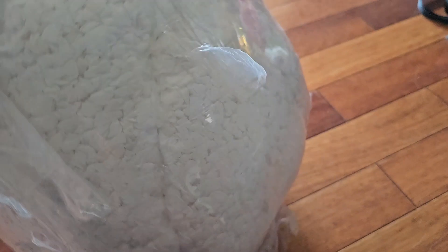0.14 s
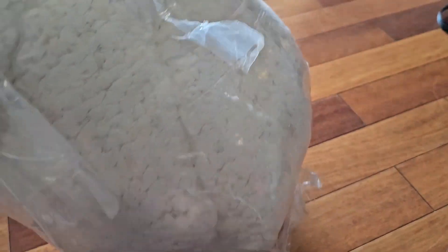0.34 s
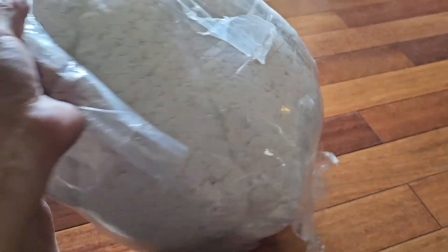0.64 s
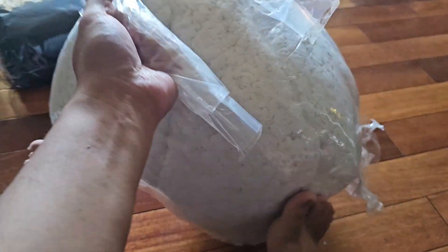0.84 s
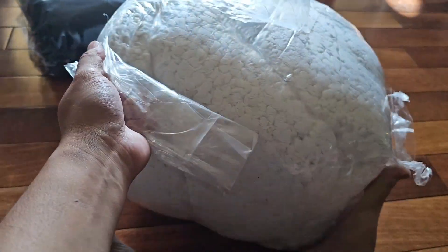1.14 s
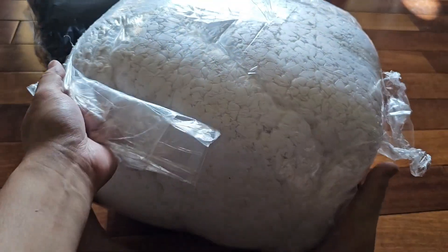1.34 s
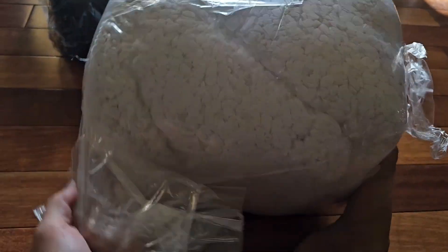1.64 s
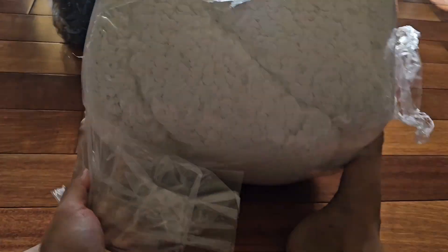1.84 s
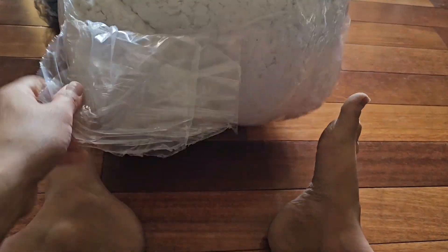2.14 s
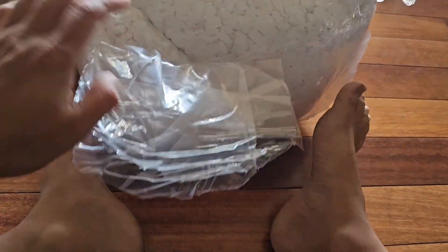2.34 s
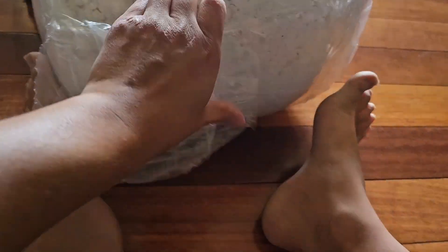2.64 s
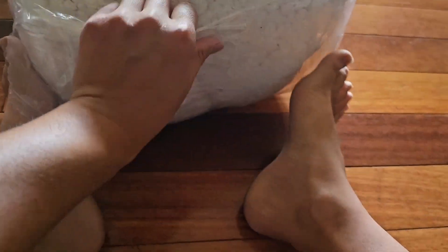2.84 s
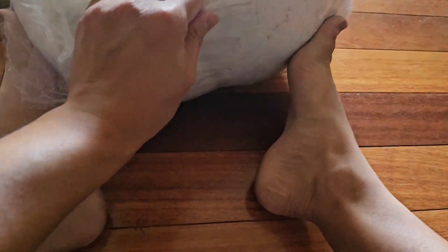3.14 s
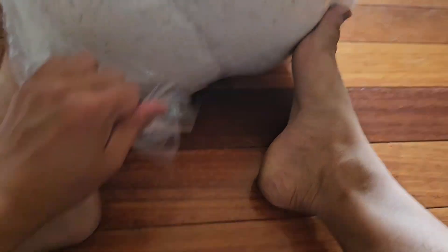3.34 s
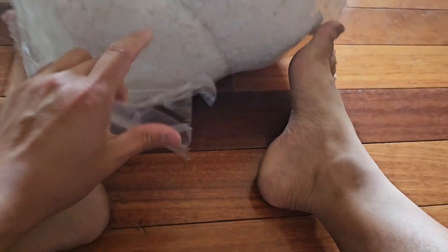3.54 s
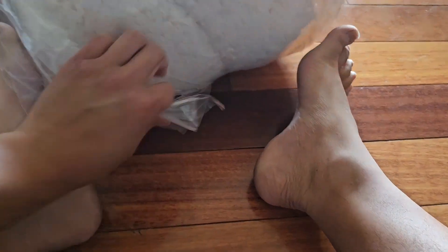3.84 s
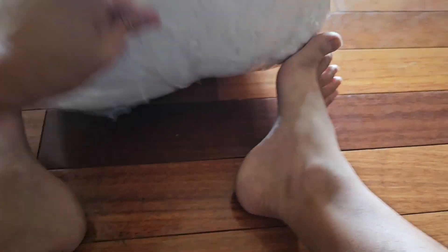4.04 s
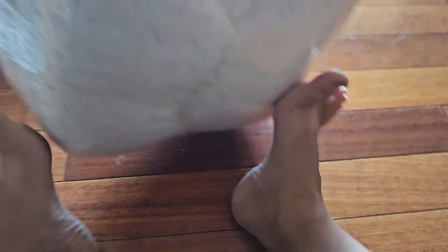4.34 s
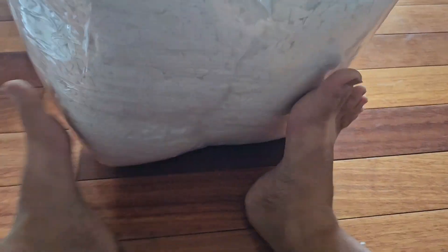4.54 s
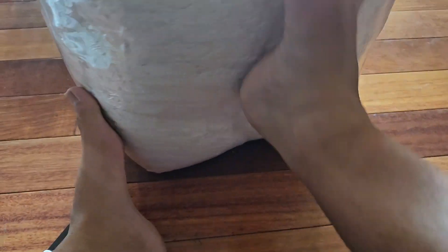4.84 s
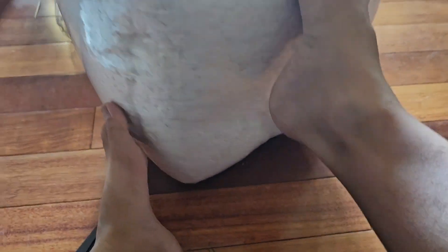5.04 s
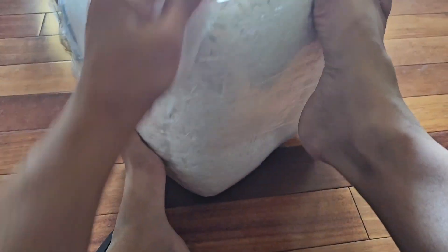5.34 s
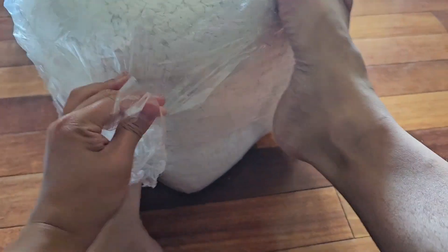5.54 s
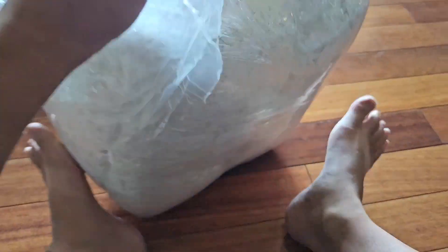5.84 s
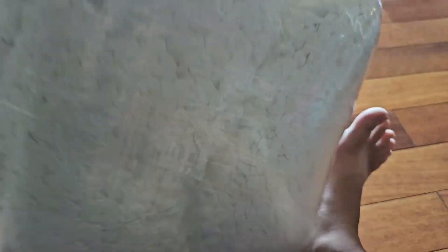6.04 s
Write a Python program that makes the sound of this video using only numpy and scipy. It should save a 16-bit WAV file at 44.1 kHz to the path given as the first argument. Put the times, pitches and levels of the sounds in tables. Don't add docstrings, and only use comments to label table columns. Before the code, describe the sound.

In a small bare quiet room, close to a phone microphone, thick plastic film rustles strongly at 0 s as a wrapped foam bale tips, with a pop and dull bump at 0.1 s. Small dents pop around 0.4 s with a faint high squeak at 0.5 s. A tape corner snaps at 0.88 s, then light crackles and ticks thin out. From 1.58 to 1.76 s a loud stuttering rip, film drumming hollowly. Sparse picking follows, growing denser from 2.6 to 3.0 s. A second, thumpier and very loud rip runs 3.2 to 3.37 s, ending in flutter. Quiet tugging crinkles lead to a flurry and a hard knock at 4.3 s, another at 4.5, then faint squeaks near 4.7. Film tenses with ticks from 5.0, building into a long rip at 5.36 to 5.55 s. Wrap crinkles off, the bale lands softly at 5.9, and a last snap sounds at 6.16 s.

```python
import sys
import numpy as np
from scipy import signal
from scipy.fft import rfft, irfft, next_fast_len
from scipy.io import wavfile
from scipy.ndimage import uniform_filter1d

SR = 44100
rng = np.random.default_rng(int(sys.argv[2]) if len(sys.argv) > 2 else 0)


def store_wav(level_fs):
    pcm = np.round(np.clip(np.atleast_2d(level_fs), -1, 1) * 32767)
    wavfile.write(sys.argv[1], SR, pcm.T.astype(np.int16))


def voltage_ratio(decibels):
    exponent = np.asarray(decibels, float) / 20
    return 10 ** exponent


N = 273420

# pitch_hz, density_db
HUSH_COLOUR = [(15, -38), (25, -0.5), (97, 0.5), (818, -19), (1130, -22.5), (5140, -32), (10100, -99),
               (13600, -36), (16000, -18.5)]
# pitch_hz, t60_s
ROOM_DECAY = [(100, 0.17), (260, 0.46), (700, 0.41), (1840, 0.49), (4850, 0.43), (12800, 0.4)]
# pitch_hz, level_db
ROOM_TONE = [(100, -6.5), (300, -4), (1000, -8), (4000, -5.5), (8000, -7), (11000, -9.5), (16000, -7)]
# pitch_hz, t60_s, level_db
STANDING = [(87.7, 0.93, -6), (176.6, 0.44, -3.5), (365, 0.63, 5)]
# pitch_hz, likeness_0_to_1
ALIKE = [(60, 0.97), (300, 0.97), (700, 0.94), (1500, 0.73), (3000, 0.25), (12000, 0.31)]
# pitch_hz, level_db
LEFT_TILT = [(30, 0), (110, 4), (200, 3.5), (1500, 3), (2800, 5), (5500, 1), (9500, 8), (14000, 3.5)]
# pitch_hz, level_db
PHONE_TONE = [(100, -2), (1000, 2), (2200, 7.5), (5000, 4.5), (10000, 10), (11600, 17.5), (13000, 11),
              (15500, 13)]
# start_s, peak_db, boom_over_peak_db
BUMPS = [
    (0.092, -29, -30),
    (0.239, -58, -12),
    (1.08, -58, 15),
    (3.11, -33, -4),
    (4.327, -20.5, -27),
    (4.523, -28.5, -12),
    (5.779, -37, -17),
    (5.92, -31.5, 0.5),
    (6.066, -39, -22),
]
# peak_s, rumble_db, fade_s
SHIFTS = [
    (0, -43, 1),
    (1.093, -47, 1),
    (1.721, -38.5, 0.24),
    (1.961, -37.5, 0.054),
    (3.327, -33.5, 0.22),
    (4.555, -48, 0.13),
    (5.0, -52.5, 0.48),
    (5.557, -34.5, 0.16),
    (5.951, -38.5, 0.17),
]
# pitch_hz, then rows of time_s, level_db
SQUEAKS = [
    (1880, [(.495, -47), (.52, -43), (.55, -59), (.62, -62), (.67, -56), (.76, -72)]),
    (1560, [(4.69, -66), (4.72, -57), (4.78, -61)]),
    (759, [(4.64, -60), (4.67, -56), (4.8, -58), (4.86, -67)]),
]
# pitch_hz, density_db
CRACKLE_COLOUR = [(900, -20.5), (2200, -2.5), (3000, -6.5), (6300, -4.5), (8400, -8.5), (10200, -12.5),
                  (11600, -7), (16000, -10.5)]
# pitch_hz, density_db
BODY_COLOUR = [(70, -15), (150, -12.5), (200, 4), (274, -1), (365, -11), (530, -4.5), (800, -5),
               (1260, -7.5), (1480, -5.5), (2500, -22.5), (5000, -70.5)]
# time_s, crackle_db
GRIP = [(0, -41.5), (.8, -56.5), (1.0, -45), (1.3, -49.5), (1.54, -57), (1.98, -48), (2.25, -52),
        (2.57, -66.5), (2.585, -50.5), (3.13, -56), (3.19, -84), (3.55, -51), (3.71, -75), (3.8, -53),
        (4.6, -79), (4.72, -50.5), (5.7, -49), (6.03, -56)]
# peak_s, crackle_db, fade_s, body_over_crackle_db
STROKES = [(0, -26.5, 0.044, 5.5), (.11, -30, 0.1, -4), (.514, -50.5, 0.19, -16), (.848, -47.5, 0.2, 5.5),
           (1.162, -35, 0.18, -6), (1.58, -36.5, 0.015, -9), (2.16, -53, 0.1, 12), (2.604, -41.5, 0.07, -3),
           (2.834, -25.5, 0.07, -17), (2.933, -31.5, 0.054, -4.5), (3.245, -22, 0.019, -4),
           (3.562, -49, 0.14, -7), (3.761, -45.5, 0.075, -7), (3.921, -42.5, 0.039, -21),
           (4.069, -37, 0.18, -9), (4.23, -34, 0.038, -4), (4.28, -31.5, .17, -6), (4.547, -41, 0.045, 0.5),
           (4.929, -44.5, 0.59, -13), (5.295, -32.5, 0.14, -15), (5.79, -33, 0.17, -3.5),
           (5.867, -38.5, 0.2, -14), (6.076, -40.5, 0.19, -10), (6.162, -34.5, 0.021, -2)]
# start_s, peak_db, pitch_hz
DENTS = [(0.243, -31, 815), (0.383, -27, 2170), (0.409, -30, 2110), (0.447, -24, 2140), (0.478, -42, 651),
         (1.134, -26, 2240), (1.153, -25, 1280), (1.685, -15, 1070), (2.826, -19, 1450), (3.034, -19, 2180),
         (3.225, -14, 815), (3.307, -11.5, 685), (3.325, -13, 720), (3.335, -13.5, 656), (3.349, -15, 810),
         (4.27, -21, 1500), (4.281, -26, 776), (4.326, -20, 710), (5.416, -21, 750), (5.429, -17, 910),
         (5.481, -17, 990), (5.530, -14.5, 990), (5.541, -15.5, 780)]
# start_s, peak_db, pitch_hz
SLACK = [(0.875, -34, 290), (0.937, -38.5, 290), (1.594, -25, 229), (1.660, -20.5, 292), (1.738, -16, 300),
         (1.757, -23.5, 363), (1.777, -27, 364.7), (3.330, -17.5, 344), (3.345, -19.5, 354),
         (3.360, -20.5, 363), (4.222, -33, 312), (5.529, -18, 276), (5.780, -35, 294), (5.796, -37, 267.8),
         (6.134, -41, 410), (6.160, -39, 350)]
# start_s, peak_db
SNAPS = [
    (0.094, -11),
    (0.8772, -9),
    (3.2485, 5),
    (6.1608, -5),
]
# start_s, level_db
FAR_POPS = [
    (.001, -4),
    (0.093, 5.5),
]
# pitch_hz, density_db
TEAR_COLOUR = [(880, -28), (1500, -13), (2120, -8.5), (3400, -3), (5600, -3.5), (10300, -9.5), (11600, -2),
               (13500, -11), (16000, -36)]
# start_s, length_s, tear_db, drum_db, lower_at_start_db, shrillness_db
RIPS = [
    (1.588, 0.15, -20, -19.5, 0.5, 1),
    (3.312, 0.0535, -19.5, -19.5, 3.5, 2),
    (5.357, 0.1793, -13, -22, 21, -3),
]
# low_hz, high_hz, swell_s
BANDS = [
    (2860, 6930, 0.0009),
    (580, 1790, 0.0013),
    (167, 530, 0.0038),
    (9800, 19850, 0.001),
]
# peak_s, crack_db, knock_over_crack_db, fizz_over_crack_db
TURNING = [(0.0942, -17.5, 1, -8.5), (0.2052, -37, -5, -9), (0.3047, -45, -11, -6),
           (0.3128, -34.5, -0.5, -10), (0.384, -39, -12, -5), (0.3938, -42, -16, 1), (0.4369, -41, 0, -6.5),
           (0.4539, -39, -10, 1.5), (0.5783, -40.5, -11, 4.5), (0.6599, -43.5, -1.5, -8),
           (0.7122, -53, -7, -1.0)]
PEELING = [(0.8222, -47, -9, 0), (0.8349, -30, -15, 9.5), (0.8453, -50, -10, 21), (0.8773, -22.5, -9, 0),
           (0.984, -42, -10.5, 4.5), (1.0139, -37.5, 1, -6), (1.0325, -41, -4, 1), (1.1188, -48, 1.0, 0),
           (1.1345, -35.5, 4.5, -6.0), (1.1541, -33.5, 2, -10.5), (1.1769, -35, -4.5, -10),
           (1.2163, -38, -19, -1), (1.269, -48.5, -16, 9), (1.3002, -36.5, -5, -8),
           (1.3271, -42.0, -11, -7), (1.3567, -42, -6, -4), (1.3785, -44, -15, -14),
           (1.4033, -42, -2.5, -2), (1.432, -46.5, -8, -8.5), (1.4437, -57, -13, -5),
           (1.4649, -49, -10, -1)]
FIRST_RIP = [(1.5605, -43, -5.5, 7), (1.5725, -26.5, -18, 5), (1.5785, -31.5, -16.0, 6),
             (1.5864, -23, -10, 2), (1.596, -20, -8, -3.5), (1.6039, -17, -9, -5.5),
             (1.6089, -11, -10, -5.5), (1.6145, -14, -4.5, -13), (1.6222, -16, -7.5, -8),
             (1.6282, -12.5, -25, -3), (1.6355, -8.5, -14, -5.5), (1.6405, -9, -15, -7),
             (1.6474, -19, -23.5, -12.5), (1.6547, -15, -11, -6), (1.6617, -13.5, -12, -2),
             (1.6702, -15, -6, -1), (1.6743, -16, -4, 1), (1.6855, -16, 2, -1), (1.691, -11.5, -10.5, -6.5),
             (1.7039, -9, -14, -3.5), (1.7086, -8, -12, -7), (1.7191, -10.5, -4.5, 0),
             (1.7263, -16.5, -14, -7), (1.7368, -9.5, -4, -5.5)]
PICKING = [(2.0236, -46, -16, -4), (2.1452, -40, -22, -7), (2.155, -42, -18, -9), (2.1955, -38.5, -26, -11),
           (2.2888, -45, -22, -2.5), (2.3457, -53, 4, -4), (2.3815, -38.5, -15, -6),
           (2.5953, -32.5, -13, -7.0), (2.6163, -36, -19, 1), (2.6381, -31.5, -3.5, -4),
           (2.668, -38.5, -3, 3), (2.6877, -34.5, -12, -8), (2.7161, -32, 0, -2), (2.7427, -30.5, 1, 4.5),
           (2.775, -42, -17, -5.0), (2.7936, -24.5, -10, 1), (2.8133, -26.5, -5, 4),
           (2.8204, -21, -24, -1.0), (2.8297, -16.5, -20, -4), (2.8347, -24.5, -2, -18),
           (2.8468, -24, -4, -3), (2.8797, -33, -19, 3), (2.9127, -19, -10.5, -5), (2.9222, -19.5, -1, 2),
           (2.9412, -18, -9, -13), (3.0337, -25, -7.5, 2), (3.0445, -44, -11, -3),
           (3.0984, -36.5, -15.0, -3), (3.1156, -40.5, 7, -9)]
SECOND_RIP = [(3.2097, -20, -31, 2.5), (3.2219, -18, 3.5, -11), (3.2266, -10.5, -6.5, 0.5),
              (3.2385, -17, -8, -5), (3.2487, -8.5, -1, -1), (3.2594, -17, -3, -1), (3.2662, -19, 0, 3),
              (3.2818, -8.5, -3, -2), (3.2905, -8.5, -0.5, -4.5), (3.3055, -10.5, -4, -1.5),
              (3.3091, -15.5, -5, -2), (3.3229, -10.5, -0.5, -2), (3.3407, -18.5, 0, 4.5),
              (3.3617, -15, -4, -2)]
FLUTTER = [(3.334, -21, 2.4, 1.5), (3.347, -29, 2.7, 5), (3.353, -24.5, 1.8, 6), (3.367, -27.5, 2.6, -4)]
TUGGING = [(3.5552, -39, -14, 2), (3.6105, -34.5, -3.5, -17), (3.6205, -41.5, -11, 2),
           (3.7366, -41.5, -9, -11), (3.7636, -40.5, -9, 1), (3.7776, -44, -14.5, -10), (3.809, -54, 3, 4),
           (3.8161, -45, -10, -4), (3.86, -37, 0, -4), (3.8835, -47.5, -8.0, 0.5), (3.9009, -45.0, -3, 2.5),
           (3.9097, -31, -2, 2), (3.9264, -27.5, -4.5, -4.5), (3.9608, -42, -18, -9.5),
           (3.9837, -47, -20.0, 6.5), (4.0291, -39, -2, 7), (4.0836, -44, -13, 7), (4.0929, -42, -16.0, 10),
           (4.2219, -25, -4, 7), (4.233, -24.5, -4, 6.5), (4.2423, -33.0, -8, 8), (4.2568, -36, 3, 8.0),
           (4.2648, -26, -1.5, 2), (4.2743, -33.5, 1, 15.5), (4.2829, -21, -2, -8), (4.2888, -29, -14, 1),
           (4.3042, -44, -13, 20), (4.3202, -29.5, -15, 10), (4.3278, -16.5, -6.5, -3),
           (4.4905, -46, -11, 3), (4.5454, -42, -18, 6.5), (4.5648, -42, -8, -1), (4.634, -42.5, -13.0, 3),
           (4.6425, -36.5, -9, -6), (4.6592, -41, -8, -2), (4.6655, -44, 4, -2), (4.7485, -45, -14, -10),
           (4.8246, -48, -9, 4), (4.8641, -38, -6.5, 0), (4.8732, -47, -8.0, 2.5),
           (4.9295, -29.5, -2.5, -2)]
TENSING = [(5.019, -49, -13.5, 4), (5.0415, -35.5, -14, -1), (5.0667, -36.5, -7.5, -1),
           (5.1066, -37, -10, -3), (5.1255, -37.0, -15, -5), (5.1497, -36.5, -6.5, -3),
           (5.1853, -38, -3, 2), (5.2307, -35.5, -19, 5.5), (5.2655, -53, -12, -3.5), (5.2791, -32, 1, 2.5),
           (5.2875, -24, -9, -1.0), (5.2956, -27.5, -14, -2.5), (5.311, -32, -6, 9), (5.3292, -29, -11, 5),
           (5.3705, -23.5, -8, 3), (5.3801, -22, -9, 4)]
THIRD_RIP = [(5.3993, -23, -6, 2.5), (5.4107, -20, -2, 3), (5.4174, -21, -9, 2), (5.43, -20.5, -7, 4),
             (5.438, -18, -4, -0.5), (5.4475, -15.5, -6, 1), (5.4557, -16, -4, 1), (5.4656, -15.5, -4, -4),
             (5.4761, -14.5, -7, 4.5), (5.5021, -17, -14, -3), (5.5077, -11, -10, -2), (5.5134, -20, 0, 7),
             (5.5212, -15, -4, -1.5), (5.5315, -13.5, -0.5, -3), (5.5424, -17, -1.5, -0.5)]
SHEDDING = [(5.7025, -39, -15, -5.0), (5.7652, -35, -21.0, -1), (5.7707, -34, -7, -6.5),
            (5.7864, -33, -11, -5), (5.8083, -21, -16, -3.5), (5.8474, -26.5, -18, 6),
            (5.865, -26, -2, 0.5), (5.8733, -21, -5, 1), (5.9713, -32, -1, 2.5), (6.0091, -42, -7, 2),
            (6.0603, -44, -3, 1), (6.0662, -39, 1, 2), (6.0807, -45, -7, 7.0), (6.0915, -38, -1, 0),
            (6.0977, -34.5, -18, -17), (6.1362, -30.5, -5, -2), (6.1445, -27, -6, -1),
            (6.1618, -24, -1.5, -10), (6.1862, -33.5, -12, -2.0)]
# releases, thump_over_crack_db, swell_slowness (ratio), drag (ratio)
GESTURES = [
    (TURNING, -12.5, 1.083, 0.884),
    (PEELING, -8, 0.71, 1.1),
    (FIRST_RIP, -10.5, 1.2, 1.15),
    (PICKING, -16.5, .8, 1.1),
    (SECOND_RIP, -12.5, .3, 1.4),
    (FLUTTER, -1, 0.9, 0.98),
    (TUGGING, -11, 1.1, .9),
    (TENSING, -23, 1.1, 1),
    (THIRD_RIP, -22, 1.4, 1.05),
    (SHEDDING, -10.5, 0.97, .9),
]


def unit(x):
    return x / np.sqrt(np.mean(x ** 2) + 1e-20)


def along(points, hz):
    f, v = np.transpose(points)
    return np.interp(np.log(hz + 1), np.log(f + 1), v)


def curves(rows):
    s, *cols = np.transpose(rows)
    return [np.interp(np.arange(N) / SR, s, c, -120, c[-1]) for c in cols]


def swells(rows, rise_s, rise_share):
    s, db, fade = np.array(rows).T[:3, :, None]
    late = np.arange(0, N, 16) / SR - s
    rise = rise_s + rise_share * fade
    return db - 20 * np.where(late > 0, late / fade, -late / rise)


def summed(levels_db, floor_db):
    power = np.repeat(np.sum(voltage_ratio(2 * levels_db), 0), 16)[:N]
    return np.sqrt(power + voltage_ratio(2 * floor_db))


def filtered(x, response):
    m = next_fast_len(x.shape[-1] + 4096)
    return irfft(rfft(x, m) * response(np.fft.rfftfreq(m, 1 / SR)), m)[..., :x.shape[-1]]


def ports(size):
    turn = lambda hz: np.arccos(np.clip(along(ALIKE, hz), 0, 1)) / 2
    middle_side = lambda hz: np.array([np.cos(turn(hz)), np.sin(turn(hz))])
    pair = filtered(rng.standard_normal(size), middle_side)
    return np.array([[1, 0.87], [1, -2.0]]) @ pair


def noise(colour):
    return filtered(ports(size=(2, N)), lambda hz: voltage_ratio(along(colour, hz)))


def grains(rate, spread_db, life):
    strength = voltage_ratio(np.minimum(spread_db * rng.exponential(size=N), 17))
    hits = (rng.random(N) < rate / SR) * strength
    fade = np.exp(-1 / (life * SR))
    return signal.lfilter([np.e * (1 - fade)], [1, -2 * fade, fade ** 2], hits)


def two_tone(colour, base, shared, rate, spread_db, life):
    share = lambda hz: 1 / (1 + (hz / 7500) ** 4)
    dull, bright = (noise(colour) * (base + shared + grains(rate, spread_db, life)) for _ in range(2))
    low = filtered(dull, lambda hz: np.sqrt(share(hz)))
    high = filtered(bright, lambda hz: np.sqrt(1 - share(hz)))
    return unit(low + high)


def hush():
    return voltage_ratio(-52.5) * unit(noise(HUSH_COLOUR))


def room(x):
    out, step = np.zeros((2, N + SR)), SR // 4
    for a in range(0, N, step):
        hz, t, z = signal.stft(ports(size=(2, SR * 3 // 5)), SR, nperseg=256)
        decay = voltage_ratio(-60 * t / along(ROOM_DECAY, hz)[:, None])
        tail = signal.istft(z * decay, SR, nperseg=256)[1]
        tail = tail * (1 - np.exp(-np.arange(tail.shape[1]) / (0.00015 * SR)))
        wet = signal.fftconvolve(x[None, a:a + step], tail / np.linalg.norm(tail[0]), axes=1)
        out[:, a:a + wet.shape[1]] += wet
    return filtered(out[:, :N], lambda hz: voltage_ratio(along(ROOM_TONE, hz)))


def standing(x):
    return sum(voltage_ratio(db) * signal.lfilter(*signal.iirpeak(hz, hz * t60 / 2.3, SR), x)
               for hz, t60, db in STANDING)


def boards():
    out, t = np.zeros(N + SR), np.arange(SR // 2) / SR
    sos = signal.butter(2, [90, 500], "band", fs=SR, output="sos")
    for s, db, boom_db in BUMPS:
        push = 6 * np.exp(-t / 0.0013)
        puff = signal.sosfilt(sos, rng.standard_normal(len(t)) * voltage_ratio(-60 * t / 0.08) + push)
        boom = np.sin(2 * np.pi * 54 * t) * voltage_ratio(boom_db - 60 * t / 0.82) * (1 - np.exp(-t / 0.0033))
        out[round(s * SR):][:len(t)] += voltage_ratio(db) * (puff / np.abs(puff).max() + boom)
    low = noise([(15, -49.5), (30, 3), (55, 6.5), (110, 4.0), (200, -11.5), (400, -37.0)])
    shifting = summed(swells(SHIFTS, rise_s=0.071, rise_share=0.72), floor_db=-70)
    return out[:N] + voltage_ratio(-3.5) * shifting * unit(low)


def squeaks():
    out = 0
    for hz, rows in SQUEAKS:
        narrow = noise([(.88 * hz, -50), (.97 * hz, -7), (hz, 0), (1.03 * hz, -7), (1.13 * hz, -50)])
        whistle = np.cos(np.angle(signal.hilbert(narrow)))
        level_db = curves([*rows, (rows[-1][0] + .03, -120)])[0]
        out = out + voltage_ratio(level_db) * whistle * unit(grains(rate=79, spread_db=-1.5, life=0.0022))
    return out


def rustle():
    grip_db = curves(GRIP)[0]
    stroke_db = swells(STROKES, rise_s=.03, rise_share=.3)
    body_db = stroke_db + np.array(STROKES)[:, 3:]
    folds = grains(rate=170, spread_db=0.5, life=0.00013)
    crackle = two_tone(CRACKLE_COLOUR, base=1.76, shared=folds, rate=140, spread_db=2.5, life=0.0013)
    body = noise(BODY_COLOUR) * (1.2 + 0.14 * folds + grains(rate=170, spread_db=2.5, life=0.0035))
    body_gain = voltage_ratio(-5.0) * summed(body_db, grip_db - 2)
    return summed(stroke_db, grip_db) * crackle + body_gain * unit(body)


def dents():
    out, t = np.zeros(N + SR), np.arange(SR // 10) / SR
    for s, db, hz in [*DENTS, *SLACK]:
        cycles = hz * t
        decay = voltage_ratio(db + 8.0 - 60 * cycles / 12.5)
        out[round(s * SR):][:len(t)] += decay * np.sin(2 * np.pi * cycles) * np.minimum(cycles, 1)
    return out[:N]


def snaps():
    jumps = np.zeros(N)
    for s, db in SNAPS:
        jumps[round(s * SR)] = voltage_ratio(db)
    return signal.sosfilt(signal.butter(1, [350, 5500], "band", fs=SR, output="sos"), jumps)


def far_pops():
    pops = np.zeros(N)
    for s, db in FAR_POPS:
        pops[round(s * SR)] = voltage_ratio(db + 12.0)
    shade = [(200, -22.0), (2000, -1.5), (4500, 6.0), (7000, 0.5), (9500, -10.5)]  # pitch_hz, level_db
    return filtered(pops, lambda hz: voltage_ratio(along(shade, hz)))


def pull():
    rows = []
    for s, length, tear_db, drum_db, lower_db, shrill_db in RIPS:
        rows += [(s - .005, -120, -120, shrill_db),
                 (s, tear_db - lower_db, drum_db - 27, shrill_db),
                 (s + 0.76 * length, tear_db, drum_db, shrill_db),
                 (s + 0.84 * length, tear_db, drum_db, shrill_db),
                 (s + length, tear_db - 15, drum_db - 2.5, shrill_db),
                 (s + length + 0.0099, -120, -120, shrill_db)]
    return curves(rows)


def tearing():
    tear_db, drum_db, shrill_db = pull()
    strands = grains(rate=300, spread_db=-6.0, life=0.0018)
    tear = two_tone(TEAR_COLOUR, base=5, shared=strands, rate=150, spread_db=4.5, life=0.0009)
    low = filtered(tear, lambda hz: 1 / (1 + (hz / 5300) ** 4))
    drum = noise(BODY_COLOUR) * (2.0 + strands + grains(rate=170, spread_db=0.0, life=0.0025))
    return voltage_ratio(tear_db) * (low + voltage_ratio(shrill_db) * (tear - low)) + voltage_ratio(drum_db) * unit(drum)


def releases():
    rows = []
    for table, thump_db, slow, drag in GESTURES:
        for s, db, knock, fizz in table:
            crack_db = db + 2.5
            thump = thump_db + 0.49 * knock + 3.5 * rng.standard_normal()
            rows.append((s, slow, drag, crack_db, crack_db + knock, crack_db + thump, crack_db + fizz - 5))
    return np.array(rows)


def slips():
    rows = releases()
    peak_s, levels_db = rows[:, :1], rows[:, 3:]
    slow, drag = rows[:, 1:3].T[..., None, None]
    t = np.arange(768) / SR
    tear = ports(size=(len(rows), 2, len(t)))
    stretch = drag * np.exp(0.15 * rng.standard_normal(drag.shape))
    burst = 0
    for (lo_hz, hi_hz, swell), db in zip(BANDS, levels_db.T):
        sos = signal.butter(2, [lo_hz, hi_hz], "band", fs=SR, output="sos")
        age = t / (swell * stretch)
        envelope = age ** slow * np.exp(-age) / (slow / np.e) ** slow
        push = 3.63 * age * np.exp(-4.5 * age)
        part = signal.sosfilt(sos, tear * envelope + 2.77 * push)
        power = uniform_filter1d(np.mean(part ** 2, 1, keepdims=True), round(2 * swell * SR))
        part = part / np.sqrt(power.max(2, keepdims=True)) * voltage_ratio(db - 7.5)[:, None, None]
        click = signal.sosfilt(sos, (t == 0) * 1.0)
        spread = click / np.linalg.norm(click) * np.linalg.norm(part[:, :1], axis=2, keepdims=True)
        burst = burst + np.concatenate([part, spread], 1)
    start_s = peak_s - .0004 - (slow * stretch)[:, 0] * BANDS[0][2]
    at = (np.round(start_s * SR).astype(int) + np.arange(len(t))).ravel()
    return np.array([np.bincount(at, burst[:, c].ravel(), N + SR)[:N] for c in (0, 1, 2)])


def scene():
    tape = filtered(slips(), lambda hz: voltage_ratio(along(PHONE_TONE, hz)))
    film = tearing() + rustle() + squeaks() + boards()
    small = dents() + snaps()
    near = tape[:2] + film + small
    walls = room(tape[2] + film[0] + voltage_ratio(-5.5) * small + far_pops())
    left, right = near + walls + standing(tape[2] + film[0] + small)
    return np.array([left, np.roll(right, 9)]) + hush()


def roll_off(x):
    return signal.sosfilt(signal.butter(12, 16970, fs=SR, output="sos"), x)


def record(dry):
    x = filtered(dry, lambda hz: voltage_ratio(along(LEFT_TILT, hz) * [[.5], [-.5]]))
    x = x / (1 + np.abs(x / .9) ** 6) ** (1 / 6)
    mix = filtered(x, lambda hz: voltage_ratio(-60 * np.clip((hz - 15760) / 300, 0, 2)))
    return roll_off(mix)


dry = scene()
out = record(dry)
store_wav(out)
```